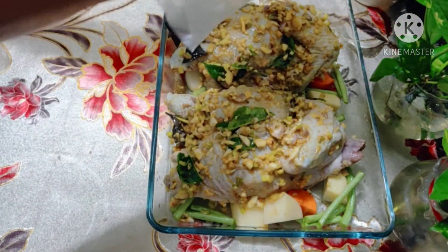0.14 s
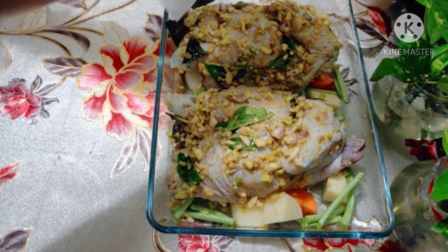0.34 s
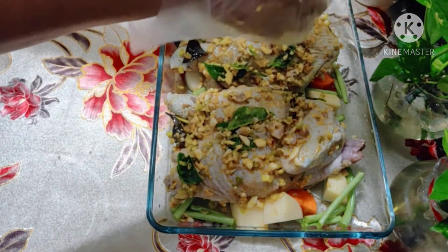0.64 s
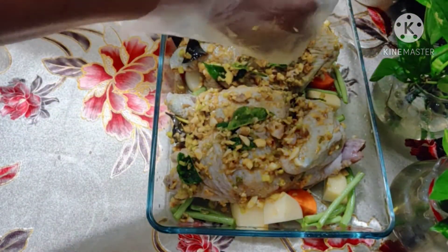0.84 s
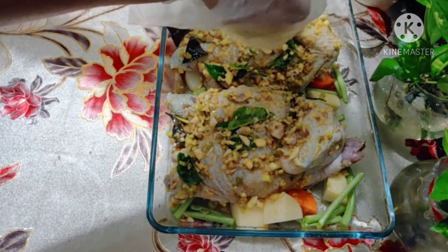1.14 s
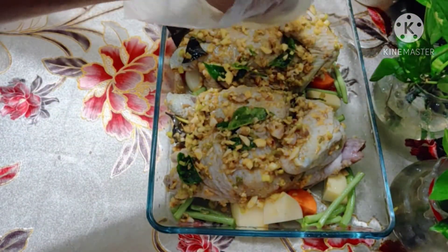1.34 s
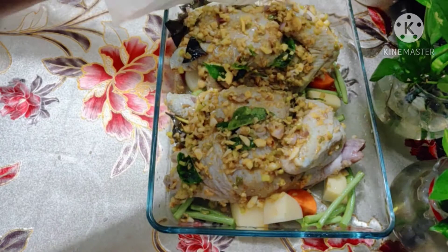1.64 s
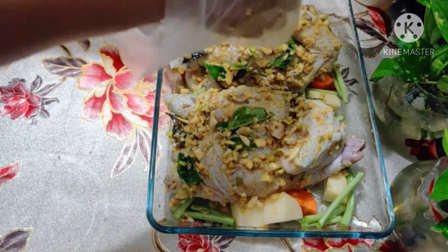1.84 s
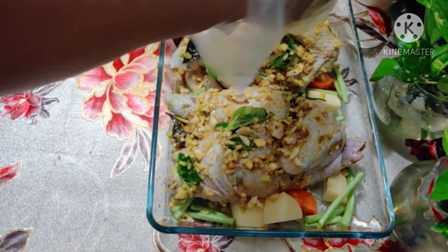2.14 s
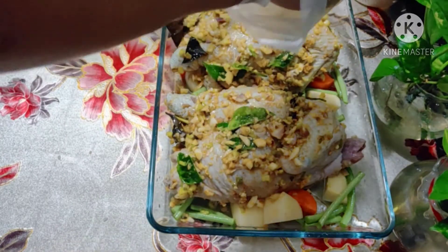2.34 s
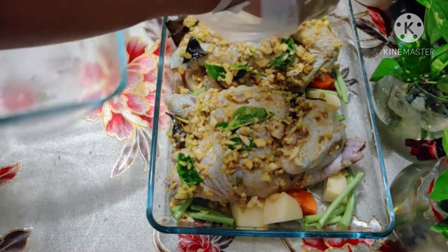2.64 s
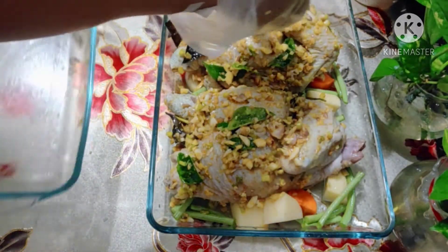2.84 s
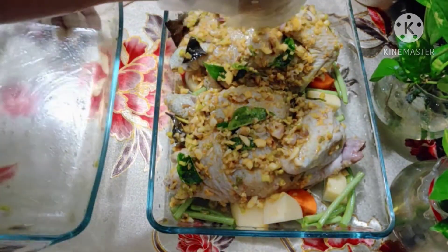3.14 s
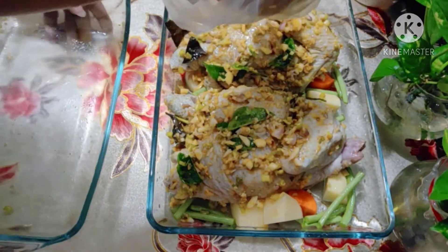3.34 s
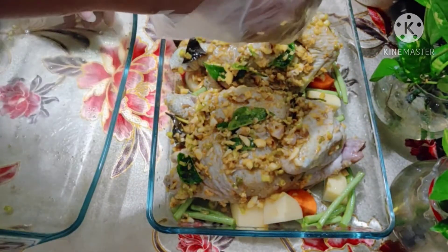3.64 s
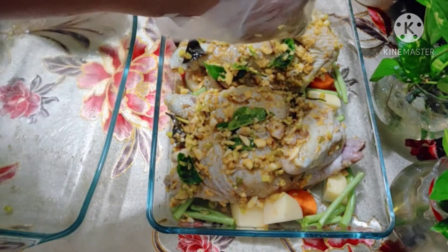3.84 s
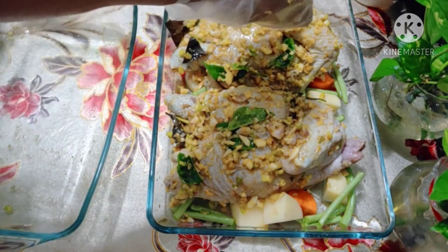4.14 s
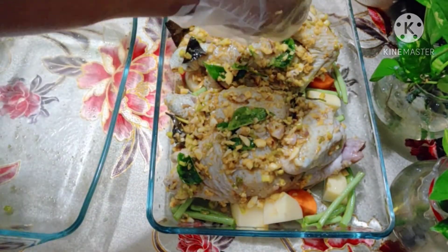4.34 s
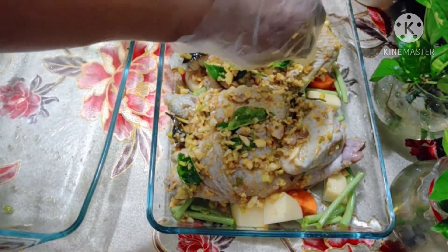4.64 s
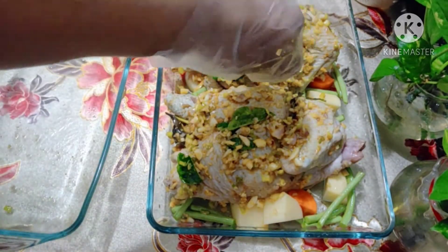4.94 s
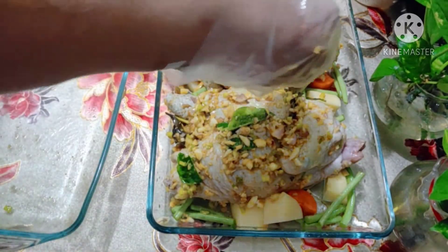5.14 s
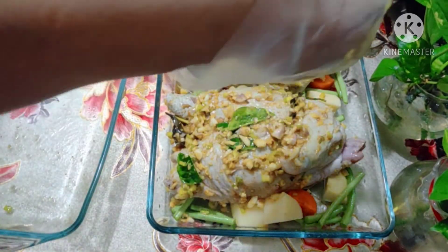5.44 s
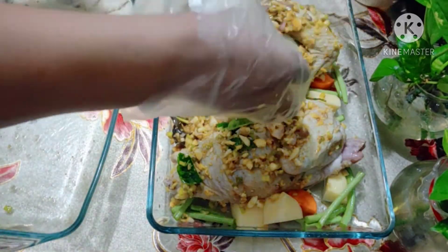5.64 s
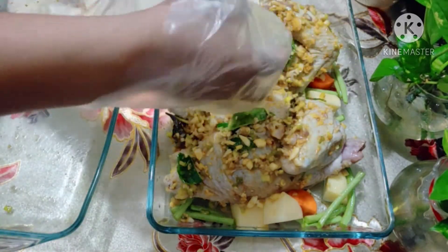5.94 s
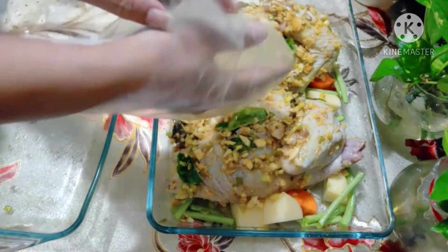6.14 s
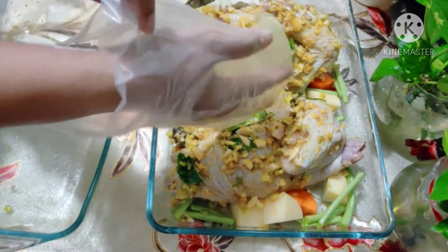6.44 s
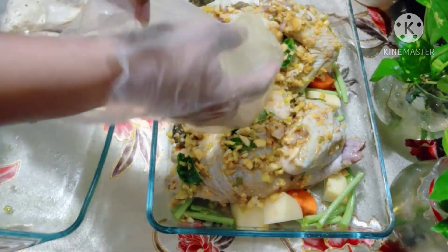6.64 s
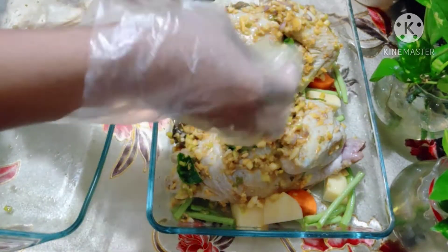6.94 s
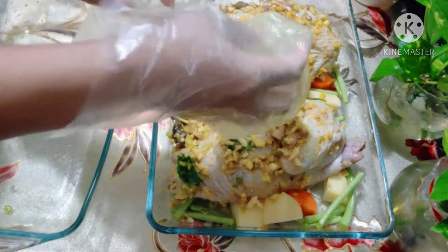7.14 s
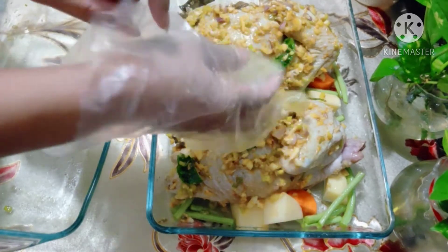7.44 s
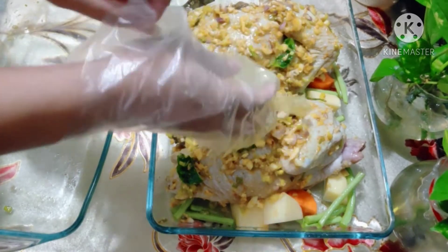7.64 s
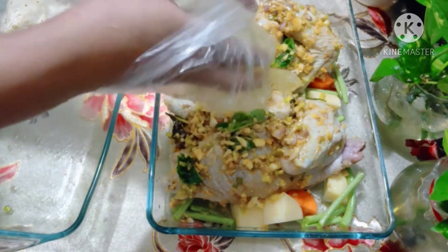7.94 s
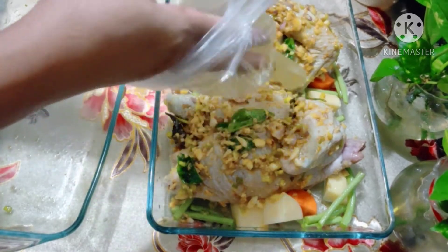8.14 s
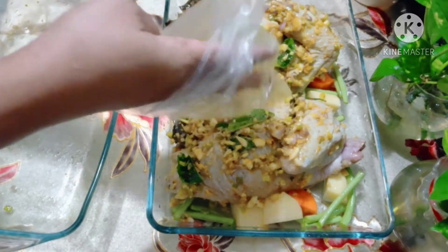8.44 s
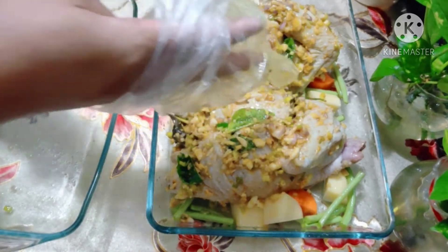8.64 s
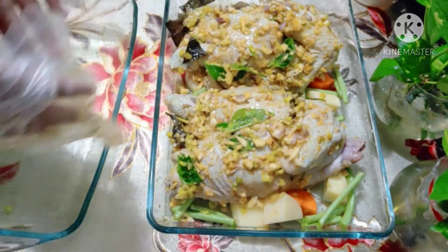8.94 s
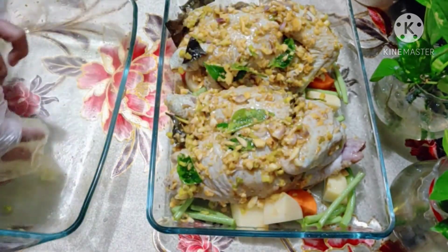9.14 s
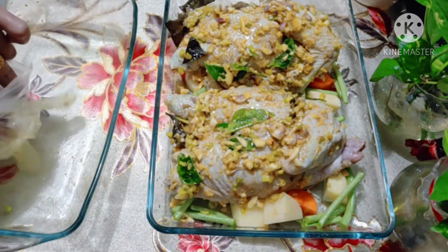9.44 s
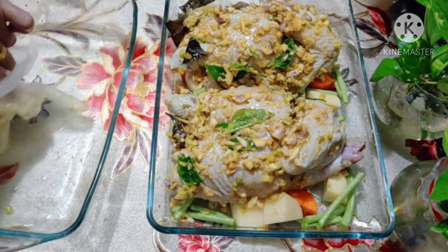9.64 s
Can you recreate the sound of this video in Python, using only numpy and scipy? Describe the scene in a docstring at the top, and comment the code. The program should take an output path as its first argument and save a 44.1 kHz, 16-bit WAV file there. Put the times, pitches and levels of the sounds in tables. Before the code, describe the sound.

Close, bright plastic film crinkling with soft wet squelches, a dish knocking down with small clinks midway, and sharp loud crackles later in a quiet kitchen.

```python
"""A kitchen, heard by a phone close to a hand in a thin plastic glove that rubs wet marinade over meat.
The film crinkles in dense tiny snaps, each a burst of shaped noise; the microphone port rings near 8 kHz.
A glass dish is set down on the table, rocks and clinks: damped modes of table and glass, with short hollow
taps and pops. A fridge hums as a wandering sine over a faint rumble of filtered noise."""
import sys
import numpy as np
from scipy import signal
from scipy.fft import rfft, irfft, next_fast_len
from scipy.io import wavfile
from scipy.ndimage import uniform_filter1d, map_coordinates

SR = 44100
rng = np.random.default_rng(int(sys.argv[2]) if len(sys.argv) > 2 else 0)


def to_wav(s):
    """Save 16-bit WAV."""
    ch = np.atleast_2d(s).T  # columns
    pcm = np.round(np.clip(ch, -1, 1) * 32767)  # PCM
    wavfile.write(sys.argv[1], SR, pcm.astype(np.int16))


N = 432621


def amp(db):
    """A level in decibels is twenty times the logarithm of its amplitude ratio."""
    return 10 ** (np.asarray(db) / 20)


def unit(x):
    """Dividing by the root mean square gives a signal unit power."""
    return x / np.sqrt(np.mean(x ** 2) + 1e-20)


def along(points, hz):
    """Hearing spaces pitch by ratios, so (frequency, value) points are joined on a log axis."""
    point_hz, value = np.transpose(points)
    return np.interp(np.log(hz + 1), np.log(point_hz + 1), value)


def curves(rows):
    """Slow control: each column after the time is interpolated linearly to one value per sample."""
    time_s, *columns = np.transpose(rows)
    return [np.interp(np.arange(N) / SR, time_s, column) for column in columns]


def wobble(knots_per_s):
    """Band-limited fluctuation: a smooth curve through normal random knots."""
    knots = rng.standard_normal(int(N * knots_per_s / SR) + 4)
    return map_coordinates(knots, [np.arange(N) * knots_per_s / SR])


def filtered(x, response):
    """Linear filtering: the spectrum is multiplied by a response of frequency."""
    size = next_fast_len(N + SR // 2)  # room for the filter to ring out
    return irfft(rfft(x, size) * response(np.fft.rfftfreq(size, 1 / SR)), size)[..., :N]


def above(x, edge_hz):
    """Small sources radiate no bass: a steep high-pass stands for their poor radiation."""
    return filtered(x, lambda hz: hz ** 6 / (hz ** 6 + edge_hz ** 6))


def dying(power, t60):
    """Exponential decay: each impulse of power jumps up and fades by 60 dB in t60 seconds."""
    return signal.lfilter([1], [1, -amp(-120 / (t60 * SR))], power)


def sides(left_over_right_db):
    """Level difference between the ears places a source: gains for left and right."""
    return amp([left_over_right_db / 2, -left_over_right_db / 2])


def ring(hz, t60, t):
    """Modal resonance: one sine fading by 60 dB in t60 seconds."""
    return amp(-60 * t / t60) * np.sin(2 * np.pi * hz * t)


def random_field(shape, bins, frames):
    """Smoothed noise over frequency and time: averaging sets the size of its patches."""
    by_bin = uniform_filter1d(rng.standard_normal(shape), size=bins, axis=0)
    return unit(uniform_filter1d(by_bin, size=frames, axis=1))


def at_ports(spectrum, patchy_db, comb_db):
    """Coherence falls with frequency: noise of rms 1 at two ports, most alike in the bass."""
    # frequency_hz, likeness (0 unrelated to 1 identical)
    likeness = [(100, 0.93), (400, 0.63), (800, 0.57), (1500, 0.31), (3000, 0.096), (8000, 0.079)]
    # frequency_hz, left_over_right_db
    tilt = [(200, 0), (400, 8), (800, 2.5), (1500, 1), (4400, 0), (8000, 3), (15000, -1.5)]
    z = signal.stft(rng.standard_normal((2, N)), nperseg=1024)[2]
    # the colour shifts in short broad patches and in slow narrow ridges
    patches = patchy_db * random_field(z.shape[1:], bins=12, frames=4)
    ridges = comb_db * random_field(z.shape[1:], bins=2, frames=18)
    pair = signal.istft(z * amp(patches + ridges), nperseg=1024)[1][:, :N]
    mid, side = rfft(pair)
    hz = np.fft.rfftfreq(N, 1 / SR)
    turn = np.arccos(np.clip(along(likeness, hz), -1, 1)) / 2
    shared, opposed = np.cos(turn) * mid, np.sin(turn) * side
    ports = np.array([shared + opposed, shared - opposed])
    return unit(irfft(ports * amp(along(spectrum, hz)) * sides(along(tilt, hz)), N))


def kitchen():
    """Magnetic force peaks twice per mains cycle: the compressor hums at that rate over a faint rumble."""
    # rumble spectrum: frequency_hz, relative_level_db (per Hz)
    air = [(20, 6.5), (60, -6.5), (100, -4.5), (200, -13.5), (400, -67), (1000, -7), (3000, -57)]
    # hum and rumble swell together: centre_s, width_s, hum_rise_db, rumble_rise_db
    swells = [(0.62, 0.14, 4.5, 2), (1.18, 0.16, 5.5, 6.5), (6.2, 0.24, 5.5, 4), (8.03, 0.21, 6, 14)]
    hum_hz, hum_db, rumble_db = 120.3, -71.5, -76.5  # at rest
    t = np.arange(N) / SR
    hum_up_db, rumble_up_db = np.zeros((2, N))
    for centre_s, width_s, hum_rise_db, rumble_rise_db in swells:
        bell = np.exp(-((t - centre_s) / width_s) ** 2)
        hum_up_db += hum_rise_db * bell
        rumble_up_db += rumble_rise_db * bell
    turns = np.cumsum(hum_hz + 0.5 * wobble(2.2)) / SR
    hum_gain = np.sqrt(2) * amp(hum_db + hum_up_db + 0.75 * wobble(5))
    hum = hum_gain * np.sin(2 * np.pi * turns)
    rumble_gain = amp(rumble_db + rumble_up_db + 1.6 * wobble(2.8))
    return hum * sides(2.7)[:, None] + rumble_gain * at_ports(air, patchy_db=1.0, comb_db=3.0)


def rubbing_db(steady_db, steady_paste_db):
    """Independent sources add in power: bell-shaped swells above steady rubbing, for crinkle and paste."""
    # swells of crinkle above the steady rubbing:
    # peak_s, crinkle_db, rise_ms and fall_ms (over 10 dB), paste_over_crinkle_db
    crinkle_swells = [(.148, -50.5, 87, 27, -15), (.323, -47, 8, 45, -16), (.394, -48, 55, 84, -16.5),
                      (.541, -50.5, 21, 32, -7.5), (.633, -55, 10, 41, -26), (1.086, -51.5, 254, 5, -16.5),
                      (1.309, -55, 10, 55, -21), (1.38, -63, 12, 37, -27), (1.8, -57, 50, 49, -13),
                      (1.97, -52, 35, 30, -19), (2.177, -52, 132, 15, -18), (2.32, -55, 45, 60, -26),
                      (2.565, -54.5, 91, 143, -32), (2.84, -50.5, 65, 45, -32), (3.165, -51.5, 37, 55, -17),
                      (3.939, -50.5, 298, 106, -17), (4.17, -51, 60, 25, -22), (4.267, -50, 155, 34, -25),
                      (4.43, -50.5, 82, 32, -36), (4.575, -49.5, 211, 48, -31), (4.814, -48, 25, 84, -10.5),
                      (4.962, -48, 35, 41, -22), (5.286, -51, 7, 95, -19.5), (5.627, -47.5, 77, 41, -18),
                      (5.811, -53, 23, 62, -17), (6.055, -51, 79, 300, -16), (6.29, -42.5, 30, 116, -13.5),
                      (6.411, -39.5, 23, 76, -14.5), (6.575, -37.5, 8, 67, -13), (6.641, -31, 43, 32, -17),
                      (6.8, -44.5, 173, 55, -17), (7.077, -43, 173, 67, -16.5),
                      (7.284, -47.5, 247, 31, -16), (7.463, -46, 204, 56, -18), (7.62, -47.5, 28, 116, -19),
                      (7.885, -44.5, 300, 207, -15), (8.459, -54, 41, 162, -28), (8.625, -53, 38, 300, -16),
                      (8.83, -52, 16, 106, -17), (8.997, -49.5, 67, 20, -22), (9.095, -48, 40, 55, -21),
                      (9.199, -47, 102, 33, -12.5), (9.352, -42.5, 115, 85, -18),
                      (9.562, -46.5, 30, 59, -22), (9.73, -48.5, 60, 38, -16)]
    ms = 1000 * np.arange(N) / SR
    film, paste = amp(2 * steady_db), amp(2 * (steady_db + steady_paste_db))
    for peak_s, db, rise_ms, fall_ms, paste_db in crinkle_swells:
        late_ms = ms - 1000 * peak_s
        bell = amp(2 * (db - 10 * (late_ms / np.where(late_ms < 0, rise_ms, fall_ms)) ** 2))
        film = film + bell
        paste = paste + amp(2 * paste_db) * bell
    return 10 * np.log10([film, paste]) + 0.81 * wobble(14)  # small restless changes, in dB


def crinkle(per_s, spread_db, snap_t60, room_t60, room_db):
    """Random impulses: amplitude of many film snaps, few large, many small, each with a short room echo."""
    struck = rng.random(N) < per_s / SR
    power = struck * amp(2 * np.minimum(spread_db * rng.exponential(size=N), 16))
    power = dying(power, snap_t60) + amp(2 * room_db) * dying(power, room_t60)
    return np.sqrt(power / uniform_filter1d(power, SR // 12))  # even power over each twelfth of a second


def creases():
    """Impulsive buckling: amplitude of single loud creases, a fast decay and a slower, weaker tail."""
    # start_s, level_db
    loud_creases = [(0.2704, -46.5), (0.3163, -41.5), (0.5364, -47), (0.628, -47), (1.3036, -47),
                    (1.365, -49), (2.3747, -45), (2.4904, -46), (2.5594, -46), (2.9327, -48), (3.512, -47),
                    (3.8154, -58), (3.8811, -49), (4.1554, -46), (4.4114, -48), (4.562, -45), (4.6932, -45),
                    (4.7334, -43), (4.812, -42), (5.152, -45), (5.1924, -42.5), (5.494, -46.5),
                    (5.9244, -51), (5.9808, -49), (6.046, -42), (6.07, -40), (6.1895, -48), (6.283, -38),
                    (6.292, -34.5), (6.4077, -30), (6.419, -29.5), (6.4314, -40), (6.561, -31.5),
                    (6.5688, -31.5), (6.576, -30), (6.583, -40), (6.5915, -33), (6.599, -34), (6.604, -38),
                    (6.8256, -39), (6.9344, -46), (7.226, -45), (7.371, -44.5), (7.5998, -46),
                    (7.8034, -43), (7.85, -36), (8.0355, -36.5), (8.205, -43), (8.4514, -49),
                    (8.8355, -41.5), (8.9804, -47), (9.044, -49), (9.1974, -40), (9.2506, -40),
                    (9.528, -51), (9.5654, -47)]
    power, t = np.zeros(N + SR), np.arange(SR // 5) / SR
    snap = amp(-120 * t / 0.02)  # t60 0.02 s
    tail = amp(-12.5 - 120 * t / 0.15)  # power starts 6.25 dB down, t60 0.15 s
    for start_s, db in loud_creases:
        power[round(start_s * SR):][:len(t)] += amp(2 * db) * (snap + tail)
    return np.sqrt(power[:N])


def glove():
    """Buckling film radiates noise bursts: bright from the film, hollow from folds, dull from wet food."""
    # steady rubbing: time_s, crinkle_db, folds_over_crinkle_db, paste_over_crinkle_db, left_over_right_db
    hand = [(0, -49, -5, -18, 1.5), (.25, -60, -2, -12, 1), (.7, -54.5, -6.5, -16.5, .4),
            (1.1, -56, -6, -19, -.5), (1.35, -58, -8, -22, -0.9), (1.45, -57, -6.5, -27, -.3),
            (1.62, -62.5, -6, -17.5, 0), (1.95, -53, -6, -16.5, 0.5), (2.45, -52.5, -5, -20.5, .55),
            (2.66, -53.5, -8, -26, 1), (2.71, -57, -7, -30, 1.5), (2.78, -55.5, -9.5, -40, .9),
            (2.85, -54.5, -5.5, -15.5, 1.3), (3.5, -51.5, -5.5, -16, .5), (4.1, -56, -6.5, -18, 1.55),
            (4.66, -50.5, -7, -16.5, 1), (4.71, -50, -5, -19.5, 1), (5.2, -51.5, -6.5, -19, 0.8),
            (5.45, -51, -5.5, -27, .3), (5.9, -53.5, -6.5, -12, 1.35), (6.53, -52, -5.5, -9, .6),
            (6.9, -53.5, -8.5, -18.7, 0.8), (7.55, -53, -6, -13.7, 1.6), (8.1, -44, -10, -19.5, 1.1),
            (8.6, -56, -6.5, -17, 1.5), (9.04, -57, -8, -9, 2.5), (9.5, -45, -8.5, -22, 3),
            (9.81, -49, -7.5, -22, 2)]
    # spectra: frequency_hz, relative_level_db (per Hz)
    film_spectrum = [(1760, -37), (3000, -17), (4290, -12.5), (6040, -8.5), (7720, -1.5), (11200, -16.5),
                     (14900, -17), (15600, -17), (16000, -65.5)]
    folds_spectrum = [(500, -21.5), (850, -10), (1120, -1.5), (1200, -4.5), (1320, 1), (1470, -2),
                      (1710, 0), (2210, 1), (3300, -2.5), (4290, -13.5), (7260, -120)]
    wet_spectrum = [(100, -51), (170, -28), (205, -6.5), (275, -13.5), (334, -5), (373, -6.5), (414, -2.5),
                    (494, 0), (536, -1.5), (627, 0.5), (749, 1), (856, -6), (1000, -0.5), (1300, -33),
                    (2200, -120)]
    steady_db, folds_db, steady_paste_db, pan_db = curves(hand)
    film_db, paste_db = rubbing_db(steady_db, steady_paste_db)
    grain = crinkle(per_s=700, spread_db=1.0, snap_t60=0.0065, room_t60=0.16, room_db=-6)
    big = creases()
    small = amp(film_db) * grain
    film = at_ports(film_spectrum, patchy_db=1.0, comb_db=2.0) * np.hypot(small, big)
    small_folds = small * amp(folds_db + 0.84 * wobble(5.4))
    folds = at_ports(folds_spectrum, patchy_db=1.5, comb_db=2.5) * np.hypot(small_folds, big * amp(-9.0))
    # the paste sucks and lets go at its own pace, its peaks softer than the film's
    sucking = amp(paste_db + 1.0 * wobble(14)) * grain ** 0.4
    wet = at_ports(wet_spectrum, patchy_db=1.5, comb_db=3.5) * np.hypot(sucking, big * amp(-21))
    left, right = (above(film + folds, edge_hz=450) + above(wet, edge_hz=154)) * sides(pan_db)
    # the further left the hand, the earlier the left port hears it
    lead_s, lead_s_per_db = .00004, .00008
    ahead = np.arange(N) + np.round(SR * (lead_s + lead_s_per_db * pan_db)).astype(int)
    return np.array([left[np.clip(ahead, 0, N - 1)], right])


def taps():
    """Damped resonance: each short hollow tap or pop rings one main mode and two weaker neighbours."""
    # start_s, level_db, pitch_hz
    hollow_taps = [(1.307, -59, 1000), (4.819, -57, 334), (6.645, -37, 1280), (9.249, -41, 646),
                   (9.291, -50, 600)]
    out, t = np.zeros((2, N + SR)), np.arange(SR // 3) / SR
    for start_s, db, hz in hollow_taps:
        tone = ring(hz, 0.056, t) + 0.078 * ring(0.64 * hz, .05, t) + 0.13 * ring(1.5 * hz, 0.027, t)
        out[:, round(start_s * SR):][:, :len(t)] += amp(db) * tone
    return out[:, :N] * sides(3.1)[:, None]


def dish():
    """Modal excitation: where the dish lands decides which table modes ring."""
    # the dish meets the table: start_s, level_db, favoured_hz, spread_octaves
    blows = [(3.182, -50, 180, 1.1), (3.195, -23.5, 255, 1), (3.1975, -40.5, 1000, 0.36),
             (3.215, -43, 450, 1), (3.228, -34, 250, 0.75), (3.24, -31.5, 114, 0.36), (3.296, -51, 115, .3),
             (3.362, -31, 180, 0.81), (3.384, -45, 250, 1.1), (3.391, -35, 207, 0.2),
             (3.411, -40, 141, 0.4), (3.431, -40, 129, 0.61), (3.714, -33.5, 294, 0.37),
             (3.721, -26.5, 310, 0.19), (3.7195, -34, 75, 0.7), (3.743, -42.5, 288, 0.59),
             (3.764, -42, 170, 0.74), (3.785, -50, 200, 0.65), (3.801, -48, 113, 0.18),
             (8.015, -51, 65, 0.5)]
    # modes of the table top: pitch_hz, relative_level_db, t60_s
    table = [(64, -15, .16), (90.5, 4.5, 0.072), (113, -6, 0.35), (143, 1.5, 0.085), (165.3, 3, 0.086),
             (202, -4.5, 0.17), (275, 1.5, 0.067), (314, -12.5, 0.22), (369, -18, 0.15), (434, 4, 0.091),
             (521, -4.5, 0.17), (598, 4, 0.059), (747, -1, 0.083), (930, -12, .08), (1080, -14, 0.19)]
    out, t = np.zeros((2, N + SR)), np.arange(SR // 3) / SR
    hz, level_db, t60 = np.transpose(table)[:, :, None]
    chance = rng.standard_normal((len(blows), 2, len(table), 1))
    onset = 1 - np.exp(-t / 0.0033)
    for (start_s, db, spot_hz, octaves), (size_db, skew) in zip(blows, chance):
        favour_db = -4.6 * (np.log2(hz / spot_hz) / octaves) ** 2
        gain = amp(db + level_db + size_db + favour_db - 60 * t / t60)
        for port, out_port in zip((1, -1), out):
            phase = port * skew * (hz / 700) ** 1.44  # the ports differ more for high modes
            modes = gain * np.sin(2 * np.pi * hz * t + phase)
            out_port[round(start_s * SR):][:len(t)] -= modes.sum(axis=0) * onset
    return out[:, :N] * sides(3.1)[:, None]


def clinks():
    """Free vibration of glass: each clink rings a low and a high mode."""
    # glass on glass: start_s, high_ring_db, low_over_high_db
    contacts = [(3.437, -53, -23), (3.472, -41.5, -29), (3.486, -62, 6.5), (3.544, -46.5, -26)]
    # low mode, then high mode: pitch_hz, t60_s
    glass = [(775, 0.42), (1335, 0.068)]
    out, t = np.zeros((2, N + SR)), np.arange(SR // 3) / SR
    (low_hz, low_t60), (high_hz, high_t60) = glass
    for start_s, db, low_db in contacts:
        tone = ring(high_hz, high_t60, t) + amp(low_db) * ring(low_hz, low_t60, t)
        out[:, round(start_s * SR):][:, :len(t)] += amp(db) * tone
    return out[:, :N] * sides(3.1)[:, None]


def scene():
    """Superposition: the sounds of kitchen, glove, taps, dish and glass add."""
    return kitchen() + glove() + taps() + dish() + clinks()


def record(dry):
    """Band limiting: the phone is deaf to the deepest bass and keeps nothing above its band limit."""
    bass_hz, top_hz = 40, 15600
    return filtered(dry, lambda hz: (1j * hz / (1j * hz + bass_hz)) ** 2 * (hz < top_hz))


dry = scene()
out = record(dry)
to_wav(out)
```